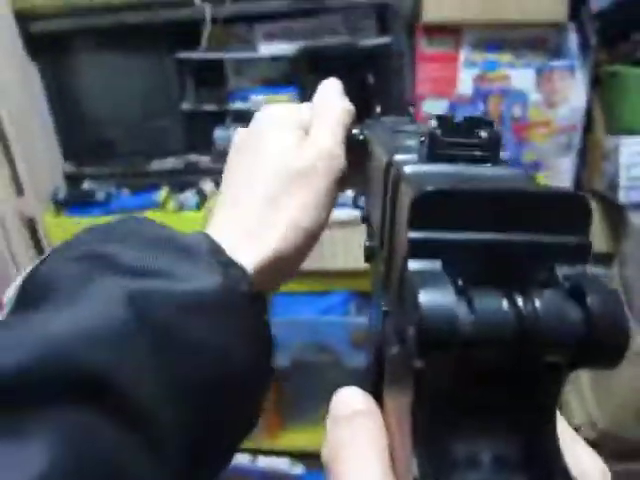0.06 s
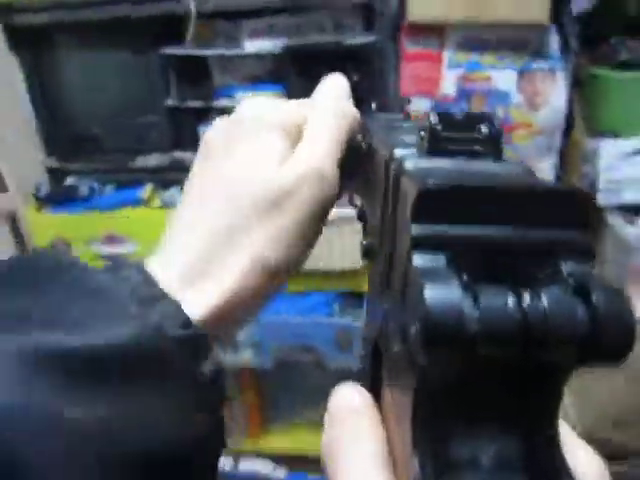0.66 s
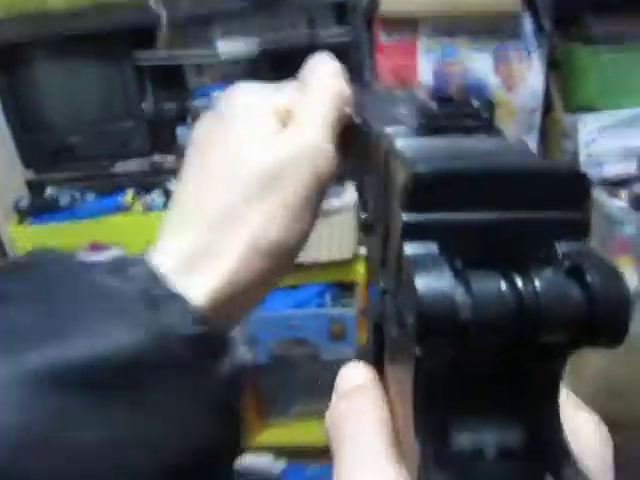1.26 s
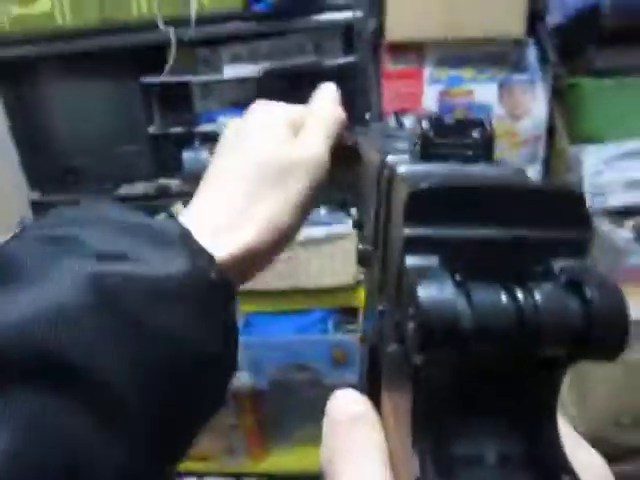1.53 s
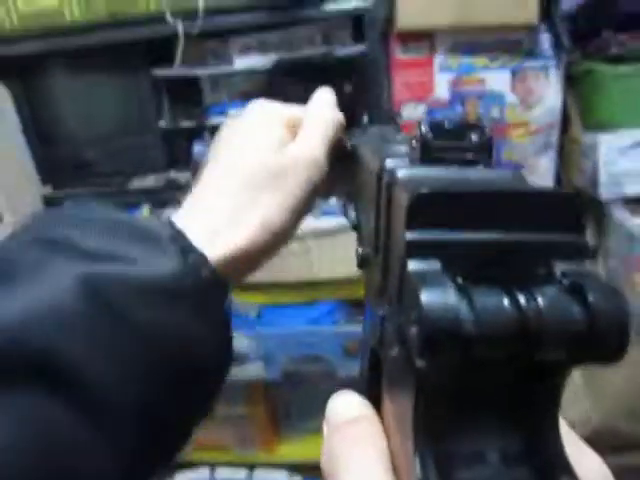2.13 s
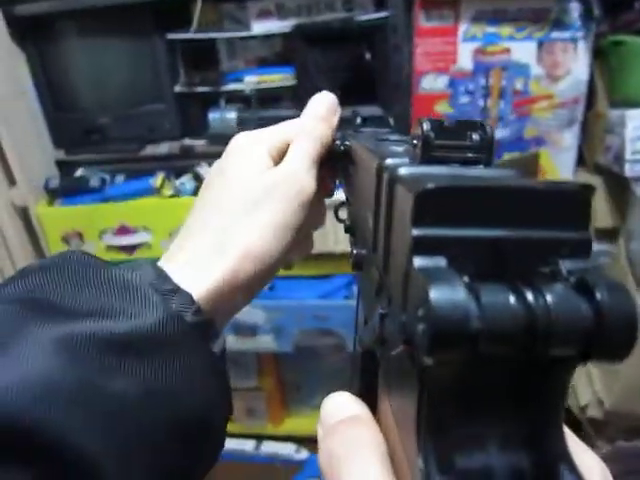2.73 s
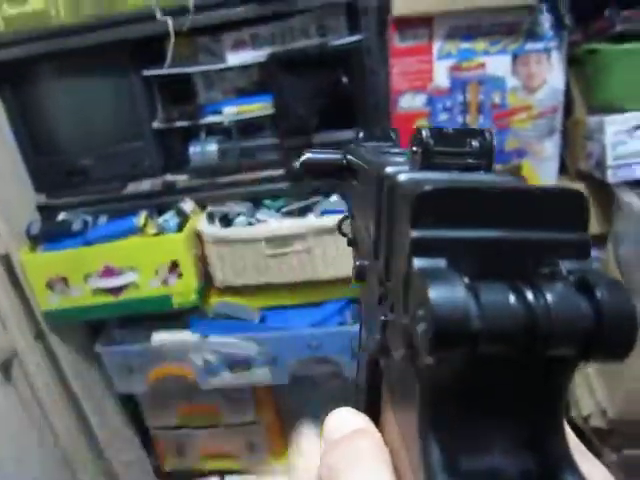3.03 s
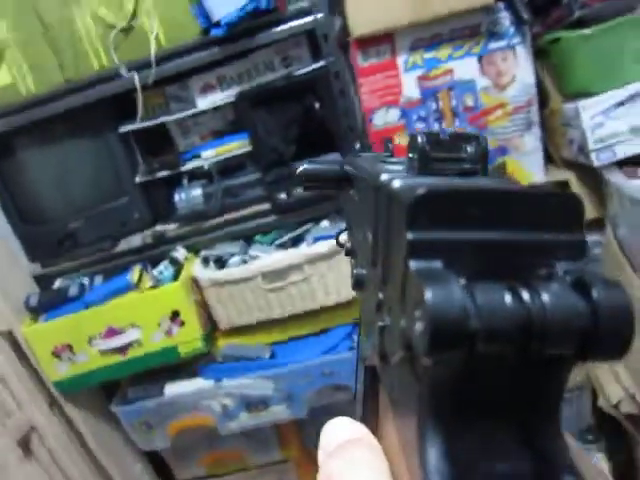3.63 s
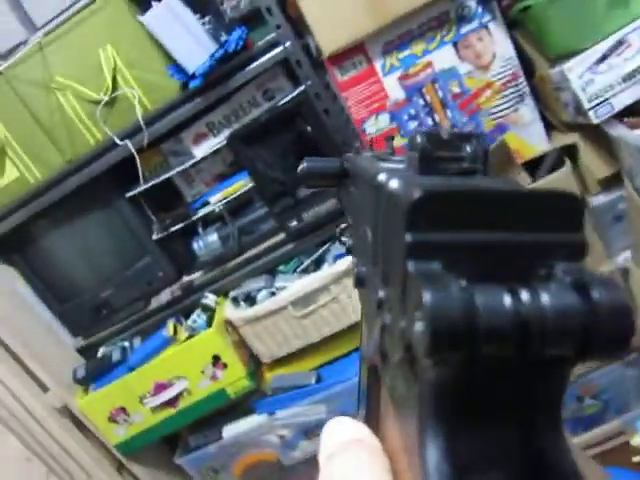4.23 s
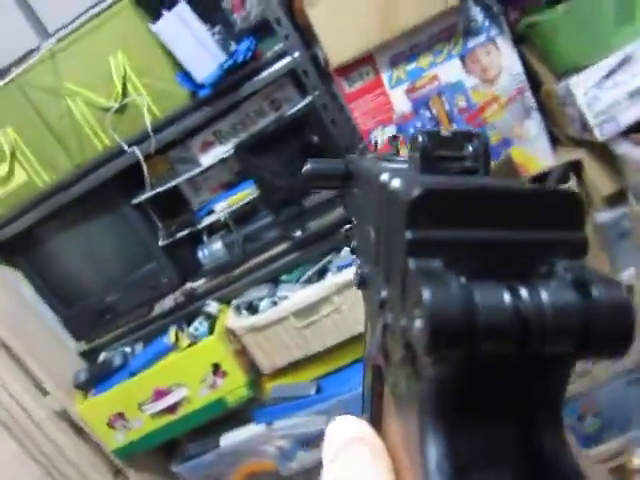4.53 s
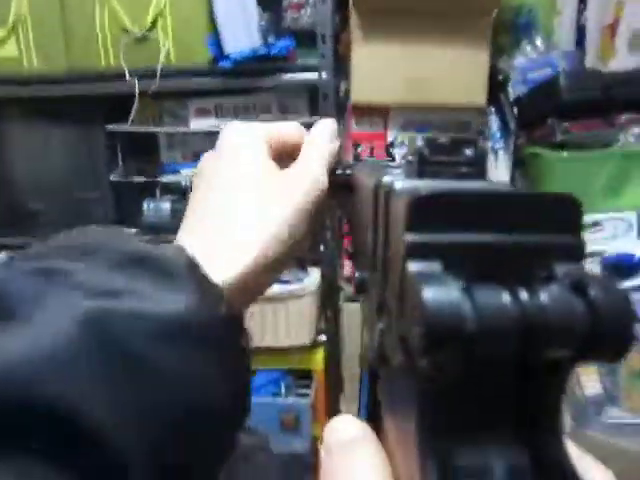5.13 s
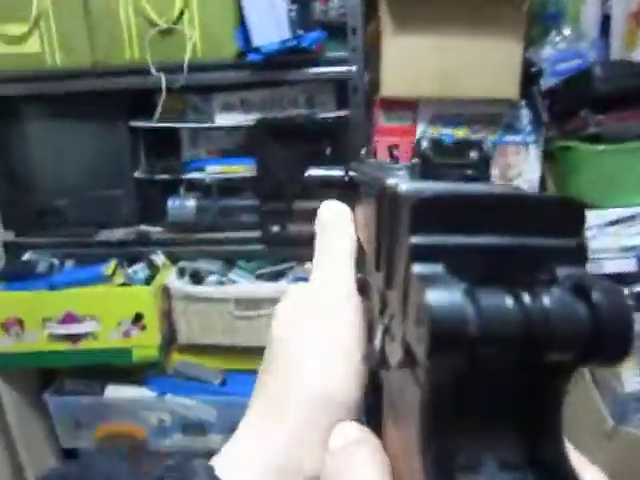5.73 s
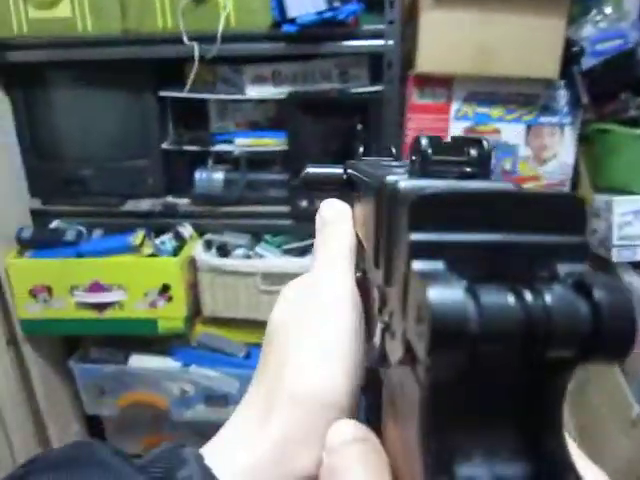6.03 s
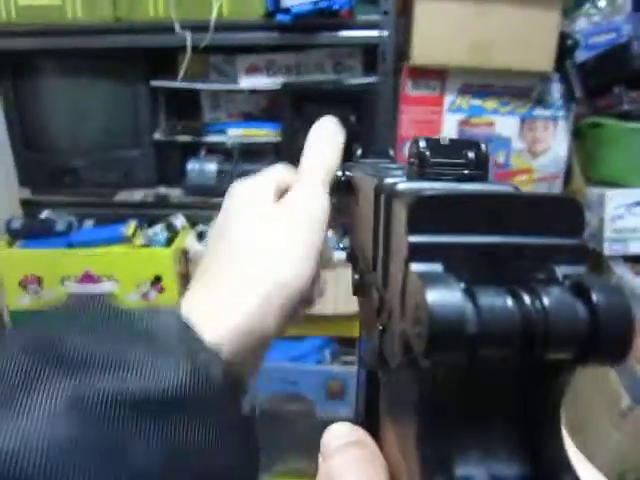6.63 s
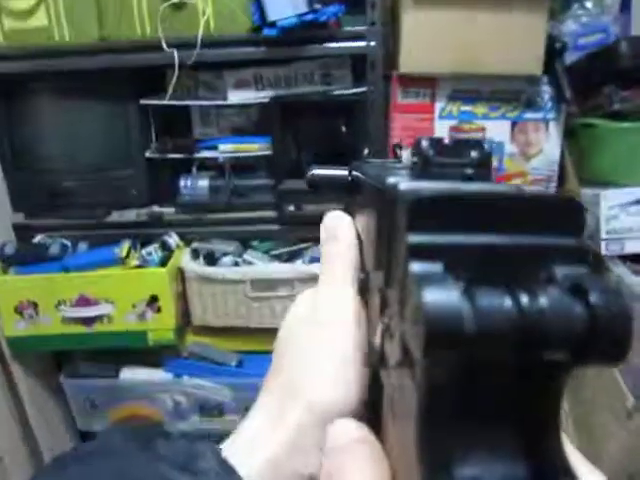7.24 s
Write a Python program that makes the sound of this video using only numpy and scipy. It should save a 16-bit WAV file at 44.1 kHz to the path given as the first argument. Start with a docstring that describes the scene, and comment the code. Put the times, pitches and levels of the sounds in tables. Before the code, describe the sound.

Close up in a small, dry room, an airsoft gun is cocked three times in quick succession: the handle scrapes back with a double click, then the bolt slams home with a brief spring buzz and steel ring. A quieter stretch of soft ticks, small clicks and sleeve rustle follows. Then comes a fourth cocking, a loud bolt slam with no pull before it, and a fifth cocking, over a faint hiss.

```python
"""Cocking an airsoft machine pistol

Five times, close by in a small cluttered room, the handle scrapes back over a catch to its stop and eases
forward, and the bolt slams home; once the bolt is freed with no pull before it. Impacts and stick-slip
friction excite the resonant shell, and each slam sets the return spring buzzing and the steel ringing.
Between the strokes come small clicks, a rustling sleeve, handling thuds on the right and a faint hiss."""
import sys
import numpy as np
from scipy import signal
from scipy.fft import rfft, irfft, next_fast_len
from scipy.io import wavfile
from scipy.ndimage import uniform_filter1d, map_coordinates

SR = 44100
rng = np.random.default_rng(int(sys.argv[2]) if len(sys.argv) > 2 else 0)


def to_wav(s):
    """Save 16-bit WAV."""
    ch = np.atleast_2d(s).T  # columns
    pcm = np.round(np.clip(ch, -1, 1) * 32767)  # PCM
    wavfile.write(sys.argv[1], SR, pcm.astype(np.int16))


N = 325458

# Coherence of the sound field. Each row: frequency in Hz, left-right correlation.
COHERENCE = [(200, .9), (560, 0.45), (1200, 0.91), (2800, 0.75), (5500, 0.57), (9000, 0.24)]
# Reverberation of the room. Each row: frequency in Hz, time to fall 60 dB (t60) in seconds.
ROOM_DECAY = [(300, .25), (2000, .17), (14000, 0.098)]
# Slow drift of the background hiss. Each row: time in seconds, level in dB.
AIR_LEVEL = [(0, -71), (2.4, -75), (2.9, -67.5), (4.3, -66.5), (4.72, -59), (5.2, -59.5), (6.25, -67),
             (6.6, -73), (7.35, -77)]
# Spectra of hiss, ticks, cloth and gun, heard through a microphone that dips near 11.3 kHz.
# Each row: frequency in Hz, relative gain in dB.
AIR_SPECTRUM = [(35, -38), (60, -10), (118, -2.5), (1110, -5), (5720, -14), (8510, -22), (11300, -35)]
HEARD_CLOTH_SPECTRUM = [(200, -19.5), (900, -5), (3000, 0), (7000, 0), (10000, -8), (11300, -23.5),
                        (13000, -14), (16000, -19.5)]
HEARD_GUN_SPECTRUM = [(60, -14), (300, -12.5), (450, -7.5), (1000, -5), (2300, -0.8), (5000, -4.7),
                      (9000, -10.5), (10300, -17), (11300, -31), (12500, -18.5), (15500, -25)]
# Soft hissy ticks. Each row: start in seconds, level in dB.
SOFT_TICKS = [(.057, -36), (.47, -49), (1.081, -55), (1.757, -52), (2.417, -56), (2.894, -41),
              (3.43, -41.5), (3.872, -39.5), (4.248, -42), (4.572, -41), (4.841, -41), (5.629, -50)]
# The sleeve brushes past, the taut sleeve zips against itself, and the grip shifts.
# Each row: middle in seconds, half length in seconds, level in dB.
SLEEVE_RUSTLES = [(.1, .12, -51), (.31, .04, -55), (2.68, .13, -61), (3.15, .25, -66), (5.63, .12, -58),
                  (6.17, .13, -70)]
SLEEVE_ZIPS = [(.19, .12, -59)]
GRIP_SHIFTS = [(.05, .12, -60), (2.7, .2, -60), (4.8, .2, -59), (5.55, .4, -56)]
# Dull bumps of hand and stock. Each row: start in seconds, level in dB, pitch in Hz.
HAND_BUMPS = [(3.265, -36, 540), (6.312, -20.5, 78.2), (6.319, -21, 175)]
# Resonances of the receiver shell. Each row: centre in Hz, half width in Hz, relative strength in dB.
SHELL_MODES = [(897, 40, -6), (1144, 130, -4), (1535, 80, -1), (2130, 110, -4), (3100, 160, -9),
               (4450, 150, -9), (6750, 120, -12)]
# Modes of the steel parts. Each row: frequency in Hz, relative level in dB, t60 in seconds.
STEEL_MODES = [(317.6, -27, 2.3), (339, -15, .4), (1034, -19, .6), (1500, -21, .8), (1642, -28, 3.2),
               (2595, -25, .77), (2923, -5, .32), (3612, -12, .3), (7386, -22, .5)]
# Ringing of a struck catch, stop or latch. Each row: start in seconds, level in dB, pitch in Hz.
LATCH_PINGS = [(.034, -35, 1290), (.5246, -33, 1260), (1.245, -21, 1150), (1.855, -20, 1110),
               (2.5785, -33, 1300), (5.083, -26, 1245), (5.33, -22, 2200), (5.5, -20, 1160),
               (5.501, -21, 3140), (6.88, -18, 2110), (6.922, -19, 2100)]
# Clicks of latches and loose parts. Each row: start in seconds, then level, knock and brightness in dB.
# Throughout, knock is a gain below 600 Hz and brightness a gain above 6 kHz.
LATCH_CLICKS = [(.0342, -33.5, -5.5, -4), (.1971, -32, -2, 2.5), (.5575, -20, -10, 7),
                (.7844, -32, -5.5, -4), (2.4852, -45, -2, -7.5), (2.5405, -39, 4, 4), (2.567, -36, 0, 6),
                (2.5785, -33.5, 4.5, -8), (2.6645, -34, 7.5, 2), (2.676, -39, 8, -3), (4.3633, -18, 0, 6),
                (4.88, -19.5, -2.5, 2), (4.9288, -32, .5, -21), (5.0823, -26.5, -10.5, -8.5),
                (5.7678, -36.5, 2, -18.5), (6.2939, -35, 9.5, -7.5), (6.4383, -45, 3, -3)]
# The hand scrapes off the handle. One row: start and end in seconds, level in dB.
HAND_GRAZE = (2.535, 2.578, -45)
# The handle is drawn back. Each row: time in seconds and level in dB of the grip, of the catch and of
# the rear stop, then rubbing level, brightness and thump level in dB.
HANDLE_PULLS = [(.5246, -30, .5707, -14.5, .6143, -12, -30.5, 1.5, -27.5),
                (1.1802, -46, 1.2463, -15, 1.291, -14, -35, -1, -29.5),
                (1.8113, -42, 1.855, -17, 1.8965, -14.5, -36, -2, -27),
                (5.18, -56, 5.2703, -10.5, 5.33, -12.5, -33, 2, -42),
                (6.8324, -37, 6.8803, -12, 6.9206, -12, -31.5, 1.5, -28.5)]
# The catch gives way in three slips. Each row: offset in seconds, level in dB, both from the catch.
CATCH_SLIPS = [(-.002, -6), (0, -2), (.0025, -3.5)]
# The handle eases forward over a double notch. Each row: second touch in seconds, its level in dB.
RETURN_NOTCHES = [(.7256, -27.5), (1.3852, -26.5), (1.9884, -28), (5.418, -41), (6.9992, -35)]
# The bolt knocks in its rails and bounces. Each row: start in seconds, level in dB, brightness in dB.
BOLT_JOLTS = [(.8187, -15.5, -4), (.8272, -14.5, 6), (.8445, -21, -5), (1.4756, -15, -5), (1.483, -20, 2),
              (1.4945, -16, 0), (1.5025, -18, -6), (2.0905, -21, -6), (2.0995, -16, -3), (2.108, -15, -2.5),
              (5.2625, -21, 7), (5.296, -22, -3), (5.3117, -17.5, 5), (6.319, -13, 2), (6.909, -19, 4),
              (7.0705, -13.5, 7), (7.0735, -15, 3)]
# The bolt runs forward. Each row: time in seconds and level in dB of the release and of the slam home,
# then scrape level, knock, brightness and spring buzz level in dB.
BOLT_SLAMS = [(.8078, -17.5, .8368, -9, -30, -1.5, -2.5, -35.5),
              (1.4617, -19.5, 1.4924, -7.5, -29, -1, -4.5, -37),
              (2.07, -24, 2.0968, -8.5, -35, -3, -5, -36), (5.484, -35, 5.5, -13, -52, 2, 1.5, -62),
              (6.3082, -13.5, 6.3274, -5.5, -23.5, 2.5, -1.5, -41.5),
              (7.0593, -27, 7.067, -9.5, -42, 4.5, 4.5, -50.5)]


def amp(db):
    """Decibels as an amplitude ratio."""
    return 10 ** (np.asarray(db) / 20)


def unit(x):
    """The signal scaled to an rms of 1."""
    return x / np.sqrt(np.mean(x ** 2) + 1e-20)


def seconds(length):
    """A time axis of the given length in seconds."""
    return np.arange(int(length * SR)) / SR


def along(points, hz):
    """Interpolation of (Hz, value) points on a logarithmic frequency axis."""
    frequencies, values = np.transpose(points)
    return np.interp(np.log(hz + 1), np.log(frequencies), values)


def add(track, s, sound):
    """Superposition: a sound joins the track at s seconds."""
    part = track[..., max(0, round(s * SR)):][..., :sound.shape[-1]]
    part += sound[..., :part.shape[-1]]


def wobble(n, rate):
    """A smooth random modulation with rate knots a second."""
    return map_coordinates(rng.standard_normal(int(n * rate / SR) + 4), [np.arange(n) * rate / SR])


def swells(rows):
    """A sum of Gaussian envelopes, one for each (middle s, half length s, dB)."""
    t = np.arange(N) / SR
    return sum(amp(db) * np.exp(-((t - s) / half) ** 2) for s, half, db in rows)


def coloured(x, level_db, padding=4096):
    """A minimum-phase filter whose gain in dB is a function of frequency."""
    n = x.shape[-1]
    m = 2 * next_fast_len((n + padding) // 2)
    cepstrum = irfft(np.log(amp(level_db(np.fft.rfftfreq(m, 1 / SR)))), m)
    cepstrum[1:m // 2] *= 2  # folding the cepstrum makes the response causal
    cepstrum[m // 2 + 1:] = 0
    return irfft(rfft(x, m) * np.exp(rfft(cepstrum)), m)[..., :n]


def stereo_noise(n):
    """Partly coherent noise, alike at the two microphones in the bass and less so in the treble."""
    m = next_fast_len(n)
    angle = np.arccos(np.clip(along(COHERENCE, np.fft.rfftfreq(m, 1 / SR)), -1, 1)) / 2
    mid, side = irfft(rfft(rng.standard_normal((2, m))) * [np.cos(angle), np.sin(angle)], m)[:, :n]
    return np.array([mid + side, mid - side])


def background():
    """Broadband noise: a faint hiss that swells and sinks slowly."""
    level_db = np.interp(np.arange(N) / SR, *np.transpose(AIR_LEVEL))
    return amp(level_db) * unit(coloured(stereo_noise(N), lambda hz: along(AIR_SPECTRUM, hz)))


def room(x, wet_db=-15, build_s=.0032):
    """Diffuse reverberation: crowded shelves scatter a short tail whose treble dies first."""
    hz, t, spectrum = signal.stft(stereo_noise(SR // 2), SR, nperseg=256)
    tail = signal.istft(spectrum * amp(-60 * t / along(ROOM_DECAY, hz)[:, None]), SR, nperseg=256)[1]
    tail *= 1 - np.exp(-(np.arange(tail.shape[1]) / SR / build_s) ** 2)
    return amp(wet_db) * signal.fftconvolve(x, tail / np.linalg.norm(tail[0]), axes=1)[:, :N]


def direct_path(x, lag_s=.000016):
    """Path difference: sound from the right reaches the left microphone a moment later."""
    m = next_fast_len(N)
    phase = np.pi * np.fft.rfftfreq(m, 1 / SR) * lag_s * np.array([[-1], [1]])
    return irfft(rfft(x, m) * np.exp(1j * phase), m)[:, :N]


def ticks(t60=.14, rise_s=.0013):
    """Exponentially decaying noise bursts, heard as soft ticks that fade in a short hiss."""
    out, t = np.zeros((2, N)), seconds(.25)
    for s, db in SOFT_TICKS:
        hiss = unit(coloured(stereo_noise(len(t)), lambda hz: along(HEARD_CLOTH_SPECTRUM, hz)))
        add(out, s, hiss * amp(db - 60 * t / t60) * (1 - np.exp(-t / rise_s)))
    return out


def sleeve_rustle(crease_db=4, rest_db=-82, slip_hz=24, slip_db=13):
    """Friction noise: nylon rustles in uneven creases and quick slips, swelling as the arm moves."""
    slip_phase = (slip_hz * np.arange(N) / SR + wobble(N, 10) / 2) % 1
    folds = amp(crease_db * np.tanh(wobble(N, 60)) - slip_db * slip_phase)
    rustle = unit(coloured(stereo_noise(N) * folds, lambda hz: along(HEARD_CLOTH_SPECTRUM, hz)))
    return (amp(rest_db) + swells(SLEEVE_RUSTLES)) * rustle


def sleeve_zip(centre_hz=8700, width_hz=450, flutter_db=4):
    """Periodic friction: fine nylon ribs slide over each other in a narrow, fluttering whistle."""
    band = coloured(stereo_noise(N), lambda hz: -20 * np.log10(1 + ((hz - centre_hz) / width_hz) ** 2))
    return swells(SLEEVE_ZIPS) * unit(band * amp(flutter_db * wobble(N, 80)))


def grip_rumble(rest_db=-71, left_db=-15, sway_hz=13.3, sway_db=6):
    """Structure-borne sound: the grip shakes the microphones, most just after each rear stop."""
    shakes = [(stop + .06, .065, thump_db - 19) for _, _, _, _, stop, *_, thump_db in HANDLE_PULLS]
    spectrum = [(20, -2), (42, 5), (62, -7), (90, -13), (200, -22.5), (800, -67)]
    rumble = coloured(rng.standard_normal(N), lambda hz: along(spectrum, hz))
    sway_phase = sway_hz * np.arange(N) / SR + wobble(N, 2) / 2  # the gun rocks in the hands
    motion = unit(rumble * amp(2 * wobble(N, 3.6))) + amp(sway_db) * np.sin(2 * np.pi * sway_phase)
    return motion * (amp(rest_db) + swells(list(GRIP_SHIFTS) + shakes)) * amp([[left_db], [0]])


def stock_thuds(stock_hz=170, stock_db=-21, thump_hz=51, thump_lag_s=.028, decay_cycles=7):
    """Damped oscillation: bumps, stops and releases jolt the stock, the deepest mainly on the right."""
    thuds = list(HAND_BUMPS)
    for _, _, _, _, stop, stop_db, _, _, thump_db in HANDLE_PULLS:
        thuds += [(stop + thump_lag_s, thump_db, thump_hz), (stop, stop_db + stock_db, stock_hz)]
    thuds += [(release, db + stock_db, stock_hz) for release, db, *_ in BOLT_SLAMS]
    out, t = np.zeros((2, N)), seconds(.3)
    for s, db, hz in thuds:
        envelope = (1 - np.exp(-t * hz * 2)) * amp(db - 60 * t * hz / decay_cycles)
        left_db = along([(50, -15), (90, -1.4)], hz)
        add(out, s, np.sin(2 * np.pi * hz * t) * envelope * amp([[left_db], [0]]))
    return out


def latch_pings(t60=.045):
    """Free vibration: a catch, stop or latch rings in one brief mode, set by where it is struck."""
    out, t = np.zeros((2, N)), seconds(.15)
    for s, db, hz in LATCH_PINGS:
        add(out, s, np.sin(2 * np.pi * hz * t) * amp(db - 60 * t / t60))
    return out


def shell_db(hz, tilt, lift=.73):
    """Resonance: shell peaks on the broad spectrum of gun and microphone, tilted by (Hz, dB) points."""
    peaks = sum(amp(db / 2) / (1 + ((hz - centre) / width) ** 2) for centre, width, db in SHELL_MODES)
    return along(HEARD_GUN_SPECTRUM, hz) + 20 * np.log10(1 + lift * peaks) + along(tilt, hz)


def spring(surge_hz=113, buzz_t60=.34, slap_db=20, hum_t60=.55, hum_db=-15):
    """Wave reflection: a surge runs up and down the coil, humming and slapping the guide each return."""
    out, t = np.zeros((2, N)), seconds(.6)
    hum = np.sin(2 * np.pi * surge_hz * t) * (1 - np.exp(-t / .02)) * amp(-60 * t / hum_t60)
    slaps = unit(amp(-slap_db * (surge_hz * t % 1)))
    tilt = [(500, -15), (3000, 0), (9000, 1)]
    for _, _, home, *_, buzz_db in BOLT_SLAMS:
        buzz = unit(coloured(slaps * stereo_noise(len(t)), lambda hz: shell_db(hz, tilt)))
        add(out, home, buzz * amp(buzz_db - 60 * t / buzz_t60) + hum * amp(buzz_db + hum_db))
    return out


def ring(modes, bright_db=0):
    """Modal decay: a damped sine for each (Hz, dB, t60 s), with its own phase at either microphone."""
    t = seconds(2)
    out = np.zeros((2, len(t)))
    for hz, db, t60 in modes:
        life = t[t < t60]
        phase = rng.random() + rng.random((2, 1)) / 2
        level_db = db + along([(3000, 0), (6000, bright_db)], hz)
        add(out, 0, amp(level_db - 60 * life / t60) * np.sin(2 * np.pi * (hz * life + phase)))
    return out


def steel(strokes, slam_db=-34, shimmer_db=-78, shimmer_t60=.35, mode_count=70):
    """Modal excitation: the strokes leave a shimmer of faint modes, and each slam rings clear ones."""
    shimmer = ring([(hz, shimmer_db, shimmer_t60) for hz in rng.uniform(1400, 8800, mode_count)])
    out = signal.fftconvolve(strokes, shimmer, axes=1)[:, :N]
    for _, _, home, home_db, _, _, bright_db, _ in BOLT_SLAMS:
        add(out, home, amp(home_db + slam_db) * ring(STEEL_MODES, bright_db))
    return out


def rubbing_envelope(bind=1.2, bind_s=.0064, ease_lead_s=.03, ease_db=-50):
    """Sliding friction: the rails rub between contacts and bind harder just before each slide ends."""
    slides = [HAND_GRAZE]
    for grip, _, catch, _, stop, _, db, _, _ in HANDLE_PULLS:
        slides += [((grip + catch) / 2, catch, db), (catch, stop, db)]
    for notch, _ in RETURN_NOTCHES:  # the handle rubs lightly until it is let go
        next_release = min(release for release, *_ in BOLT_SLAMS if release > notch)
        slides.append((notch - ease_lead_s, next_release, ease_db))
    slides += [(release, home, db) for release, _, home, _, db, *_ in BOLT_SLAMS]
    out = np.zeros(N)
    for start, end, db in slides:
        remaining = seconds(max(end - start, .002))[::-1]
        add(out, start, amp(db) * (1 + bind * np.exp(-remaining / bind_s)))
    return uniform_filter1d(out, size=60)


def rail_scrape(grain_db=3, slip_rate=600, judder_db=2.5, rail_hz=1270, width_hz=130, rail_db=6):
    """Stick-slip friction: dense uneven grains excite the rail's own resonance and the shell."""
    def response_db(hz):
        rail_peak = rail_db / (1 + ((hz - rail_hz) / width_hz) ** 2)
        return rail_peak + shell_db(hz, [(300, -3), (1200, -1), (8000, 0)])

    grains = stereo_noise(N) * amp(grain_db * wobble(N, slip_rate) + judder_db * wobble(N, 140))
    return rubbing_envelope() * unit(coloured(grains, response_db))


def impacts(rows, crack_t60=.014, rattle_t60=.091, rattle_db=-18, chatter_db=3.5):
    """Impact excitation: a hard crack, then a short rattle of loose parts, radiates through the shell."""
    out, t = np.zeros((2, N)), seconds(.12)
    for s, db, knock_db, bright_db in rows:
        envelope = amp(-60 * t / crack_t60) + amp(rattle_db - 60 * t / rattle_t60)
        force = envelope * amp(chatter_db * wobble(len(t), 900)) * stereo_noise(len(t))
        tilt = [(600, knock_db), (1200, 0), (3000, 0), (6000, bright_db)]
        hit = coloured(force, lambda hz: shell_db(hz, tilt))
        attack_rms = np.sqrt(np.mean(hit[:, t < .003] ** 2))
        add(out, s, amp(db) * hit / attack_rms)
    return out


def action_contacts():
    """Collisions of handle and bolt. Each row: start in seconds, level, knock and brightness in dB."""
    rows = []
    for grip, grip_db, catch, catch_db, stop, stop_db, rub_db, bright_db, _ in HANDLE_PULLS:
        rows.append((grip, grip_db, -6, bright_db - 6))
        rows.append((catch - .0065, rub_db + 6, 0, bright_db))  # the rails snag just before the catch
        rows.append((stop, stop_db, -3, bright_db))
        rows += [(catch + s, catch_db + db, -2, bright_db) for s, db in CATCH_SLIPS]
    for s, db in RETURN_NOTCHES:
        rows += [(s - .0098, db - 9, 0, 0), (s, db, 0, 0)]  # a light touch, then a firmer one
    for release, release_db, home, home_db, _, knock_db, bright_db, _ in BOLT_SLAMS:
        rows.append((release, release_db, knock_db - 3, bright_db + 3))  # thinner than the slam
        rows.append((home, home_db, knock_db, bright_db))
    return rows + [(s, db, 0, bright_db) for s, db, bright_db in BOLT_JOLTS]


def scene():
    """Superposition of airborne and structure-borne sound; the gun is close and a little to the right."""
    strokes = impacts(action_contacts()) + rail_scrape()
    gun = strokes + impacts(LATCH_CLICKS) + steel(strokes) + spring() + latch_pings()
    airborne = direct_path(gun) + room(gun) + ticks() + sleeve_rustle() + sleeve_zip() + background()
    return airborne * amp([[-.9], [.8]]) + grip_rumble() + stock_thuds()


def record(dry, top_hz=16100):
    """Saturation and band limiting: the hardest peaks flatten at full scale; the top treble is cut."""
    clipped = dry / (1 + np.abs(dry) ** 6) ** (1 / 6)
    m = next_fast_len(N + SR // 2)
    return irfft(rfft(clipped, m) * (np.fft.rfftfreq(m, 1 / SR) < top_hz), m)[:, :N]


dry = scene()
out = record(dry)
to_wav(out)
```